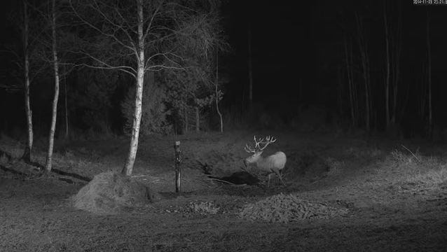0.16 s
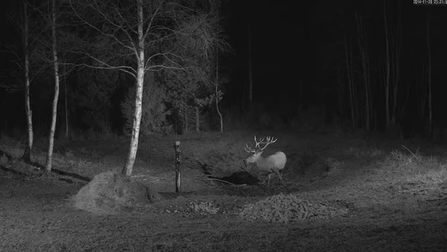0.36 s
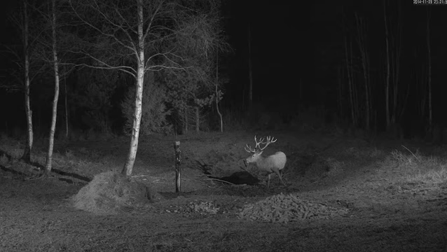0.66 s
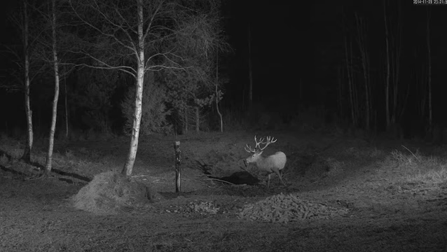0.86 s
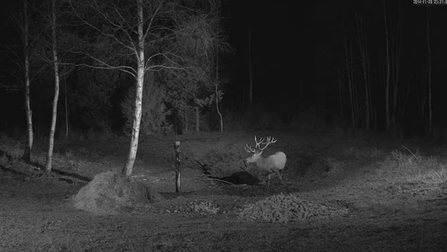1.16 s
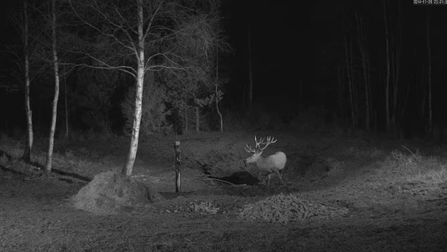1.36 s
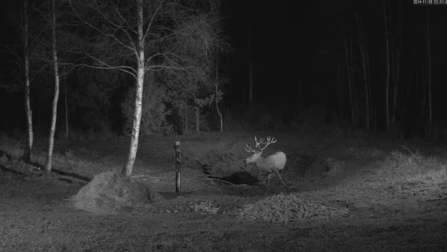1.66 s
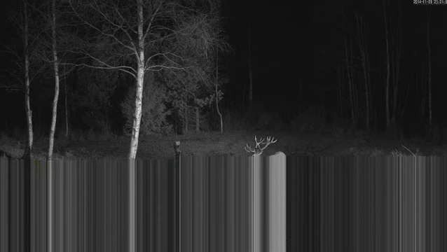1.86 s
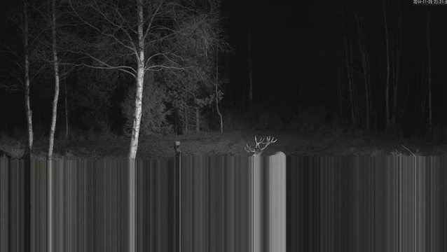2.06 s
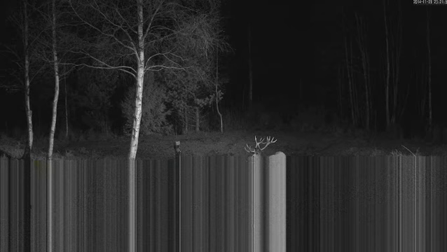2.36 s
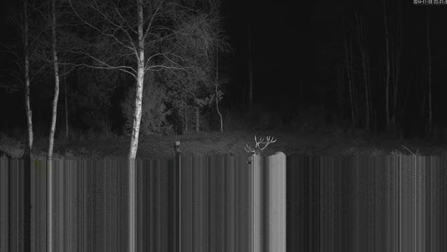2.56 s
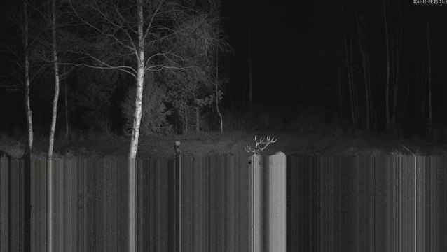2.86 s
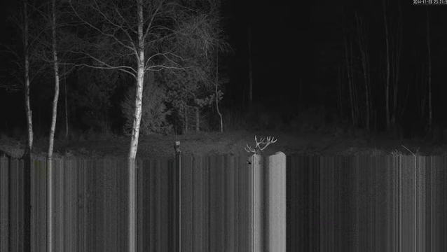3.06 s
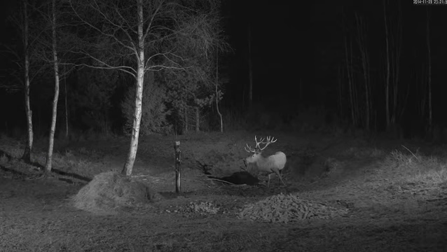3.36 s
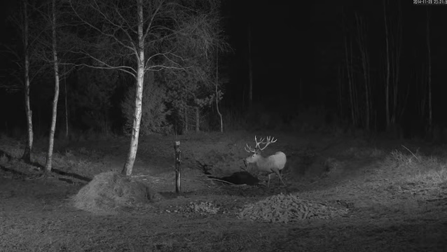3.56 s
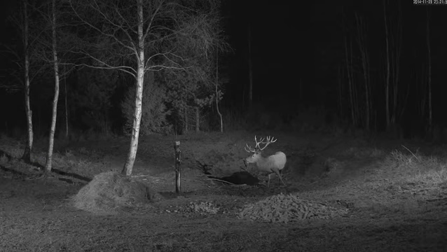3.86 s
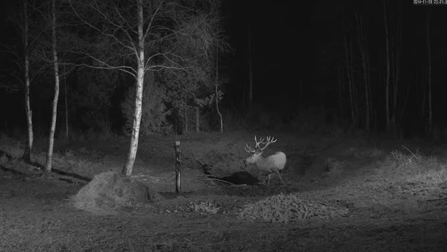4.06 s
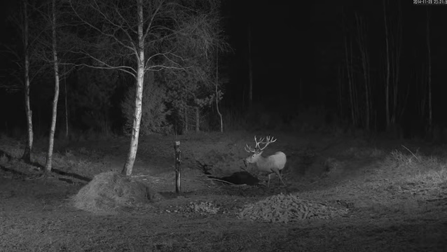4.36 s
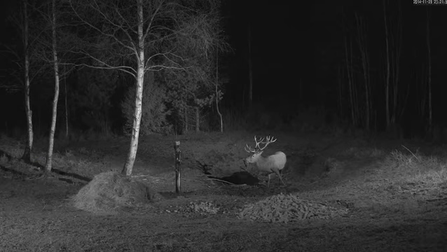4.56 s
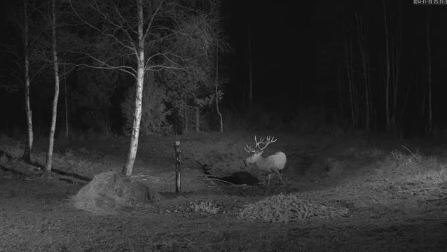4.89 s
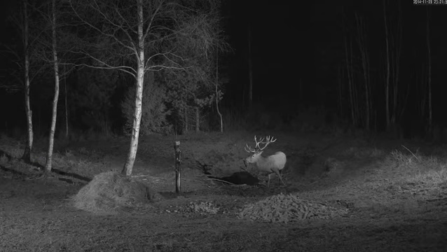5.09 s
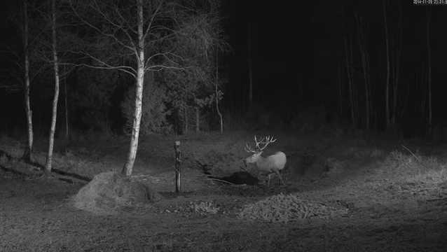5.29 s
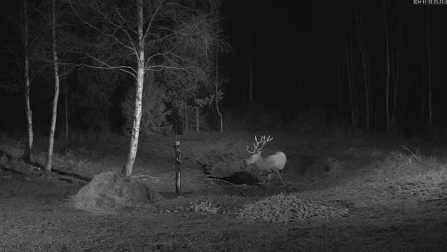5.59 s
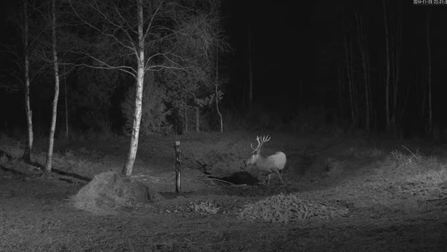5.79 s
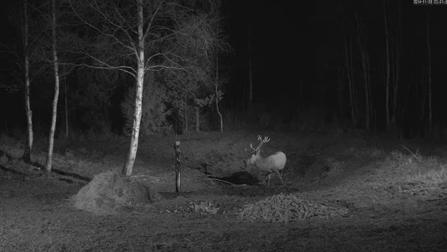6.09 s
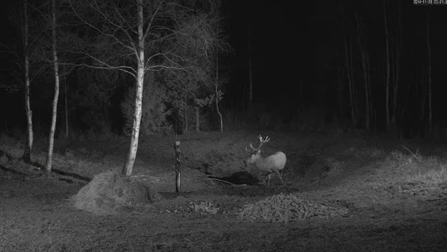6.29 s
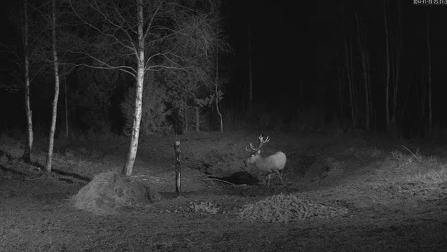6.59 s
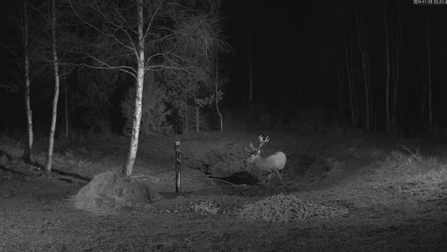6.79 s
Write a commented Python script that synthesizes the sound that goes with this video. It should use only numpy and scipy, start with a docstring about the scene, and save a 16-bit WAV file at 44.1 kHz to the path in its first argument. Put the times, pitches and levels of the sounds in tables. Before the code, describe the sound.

Irregular brittle crunches and clicks of a deer chewing hard feed in quiet woods, with dry rustles, soft hoof thuds and low wind rumble.

```python
"""A forest feeding spot at night: a stag, some way from the microphone, cracks and grinds hard feed.
Each crack is a short noisy break ringing two main resonances; it echoes off nearby trunks and lingers in the wood.
Filtered grains make the grinding and the stirring of dry litter, damped low resonances the hoof thuds.
Low filtered noise buffets the microphone as wind, over the faint banded hush of the wood."""
import sys
import numpy as np
from scipy import signal
from scipy.io import wavfile
from scipy.ndimage import uniform_filter1d

SR = 44100
rng = np.random.default_rng(int(sys.argv[2]) if len(sys.argv) > 2 else 0)


def store_pcm(level_fs):
    """Save levels as 16-bit WAV."""
    pcm = np.round(np.clip(level_fs, -1, 1) * 32767).astype(np.int16)
    wavfile.write(sys.argv[1], SR, np.atleast_2d(pcm).T)


N = 305789


def undb(db):
    """Amplitude factor of a level in dB."""
    return 10 ** (np.asarray(db) / 20)


def level(x, db):
    """Sound brought to an rms level in dB."""
    return x * undb(db) / np.sqrt(np.mean(x ** 2))


def peak(x, db):
    """Sound brought to a peak level in dB."""
    return x * undb(db) / np.max(np.abs(x))


def add(out, start_s, sound):
    """Mix a sound in at its start, cut at the end of the scene."""
    i = int(start_s * SR)
    out[i:i + len(sound)] += sound[:N - i]


def curves(table):
    """Columns of a table as one value per sample, in straight lines between the times of its first column."""
    time_s, *columns = np.transpose(table)
    return [np.interp(np.arange(N) / SR, time_s, column) for column in columns]


def resonate(x, hz, width_hz):
    """Two-pole resonance, gain 1 at the centre."""
    return signal.lfilter(*signal.iirpeak(hz, hz / width_hz, fs=SR), x)


def colour(x, modes):
    """Sum of resonances, each passed twice to steepen it, neighbours in opposite sign."""
    out = 0
    for k, (hz, width_hz, db) in enumerate(modes):
        steep = resonate(resonate(x, hz, width_hz), hz, width_hz)
        out = out + (-1) ** k * undb(db) * steep
    return out


def walk(rate):
    """Random levels held 1 / rate s and smoothed twice; spread near 1."""
    k = int(SR / rate)
    held = np.repeat(rng.standard_normal(N // k + 1), k)
    return 2.16 * uniform_filter1d(uniform_filter1d(held, k), k)[:N]


def grains(per_s, spread_db):
    """Tiny clicks at random moments, a few larger than the rest."""
    hit = rng.random(N) < per_s / SR
    size_db = spread_db * np.minimum(rng.exponential(size=N), 4)
    return hit * rng.standard_normal(N) * undb(size_db)


def hush():
    """Noise in bands a third of an octave apart that swell together and flicker alone."""
    # spectrum of the wood's hush: pitch_hz, relative density_db [dB per Hz]
    spectrum = [(53, -30), (90, 11), (151, -10), (249, 0.5), (352, -4), (652, -1), (976, -10),
                (1430, -19.5), (2980, -19), (4460, -14), (6000, -17.5), (7490, -19.5), (8910, -75),
                (11600, -74), (19600, -120)]
    hz_at, db_at = np.transpose(spectrum)
    out, swell = 0, walk(1.594)
    for hz in 100 * 2 ** np.arange(0, 6.6, 1 / 3):
        db = np.interp(np.log(hz), np.log(hz_at), db_at) + 0.79 * swell + 1.2 * walk(9)
        out = out + undb(db) * colour(rng.standard_normal(N), [(hz, hz / 3, 0)])
    return level(out, -57.5)


def wind():
    """Slow pressure swings on the membrane and a quicker, gusty flutter riding on them."""
    # wind on the microphone before the random gusts: time_s, buffet_db, flutter_db [rms]
    gust_levels = [(0.0, -36.5, -36), (0.35, -25, -60.5), (0.55, -43.5, -51.5), (0.91, -30, -67),
                   (1.15, -38, -52.5), (1.75, -39, -53), (1.95, -34, -68), (2.33, -34, -51.5),
                   (2.87, -32.5, -47), (3.05, -22.5, -55), (3.22, -25, -33), (3.43, -24, -40.5),
                   (3.67, -24.5, -33.5), (3.99, -30.5, -56), (4.1, -23.5, -48), (4.3, -31, -56),
                   (4.46, -19.5, -47), (4.58, -26.5, -51), (4.8, -21, -42), (5.15, -22.5, -49.5),
                   (5.36, -20, -30.5), (5.46, -14, -46), (5.8, -32, -47), (5.9, -30.5, -34),
                   (6.06, -21.5, -49), (6.18, -22, -31), (6.37, -27.5, -52.5), (6.56, -23.5, -35.5),
                   (6.66, -20, -62.5), (6.8, -17, -28.5), (6.93, -24.5, -39)]
    buffet_db, flutter_db = curves(gust_levels)
    # modes: centre Hz, width Hz of each pass, dB
    buffet = colour(rng.standard_normal(N), [(8.24, 9.83, 6.0), (18.7, 17.95, -2.0), (29.85, 11.5, -8.5)])
    flutter = colour(rng.standard_normal(N), [(42.0, 20.8, 9.0), (71.0, 36, -12.5)])
    gust = walk(7.7)
    buffet = np.tanh(0.6 * level(buffet, 0))  # the widest swings are rounded off
    buffet = level(buffet, 0) * undb(buffet_db + 1.0 * gust)
    flutter = level(flutter, 0) * undb(flutter_db + 0.44 * gust + 1.3 * walk(16))
    return buffet + flutter


def wood(x):
    """Smeared echoes off the nearest trunks, then a lumpy tail that builds up and dies band by band."""
    # echoes off single trunks: delay_s, level_db [total energy]
    trunk_echoes = [(.013, -17.5), (0.021, -20), (0.027, -12.5), (.036, -20.5), (0.057, -26.5),
                    (0.086, -25)]
    # lingering tail: centre_hz, t60_s [time to fall 60 dB], level_db [rms before build-up and decay]
    tail_bands = [(600, 0.18, -57), (1040, 0.68, -52), (1810, 1, -54), (2800, 0.66, -50), (4500, 0.64, -46),
                  (6500, 0.95, -60)]
    t = np.arange(SR) / SR
    echo = np.zeros(SR)
    for delay_s, db in trunk_echoes:
        smear = grains(6000, spread_db=1.2)[:SR] * np.exp(-.5 * ((t - delay_s) / 0.0041) ** 2)
        echo += smear * undb(db) / np.sqrt(np.sum(smear ** 2))
    lumps_db = 0.94 * walk(150)[:SR]  # farther trunks stand unevenly
    build_up = 1 - np.exp(-t / 0.067)
    for hz, t60_s, db in tail_bands:
        band = level(colour(rng.standard_normal(SR), [(hz, 0.75 * hz, 0)]), db)
        echo += band * build_up * undb(lumps_db - 60 * t / t60_s)
    return signal.fftconvolve(x, echo)[:N]


def stirs():
    """Level of each litter layer in dB: every stir swells, holds and fades, their powers add."""
    # stirs of the litter: height_s, length_s, crisp rustle_db, dull scrape_db, low shuffle_db [at the height]
    stir_list = [(0.0, 0.052, -54.5, -56.5, -49.5), (0.271, 0.32, -47, -62, -55.5),
                 (0.402, 0.1, -56, -55.5, -57.5), (0.636, 0.12, -52.5, -73, -70),
                 (0.808, 0.2, -46, -58.5, -59), (1.111, 0.12, -53, -70, -62),
                 (1.337, 0.21, -46, -58.5, -59.5), (1.697, 0.24, -51, -58.5, -58.5),
                 (2.078, 0.24, -63, -67.5, -66.5), (2.257, 0.15, -61, -57.5, -58.5),
                 (2.606, 0.23, -54.5, -72.5, -66), (2.774, 0.091, -58.5, -50, -56),
                 (3.014, 0.16, -49, -52, -60), (3.225, 0.14, -53, -54, -49.5),
                 (3.385, 0.45, -57, -60, -54.5), (4.054, 0.13, -58, -61.5, -53.5),
                 (4.3, 0.24, -61, -59, -60), (4.711, 0.16, -64, -51.5, -51),
                 (5.046, 0.061, -61.5, -63.5, -55), (5.32, 0.24, -64, -63, -54.5),
                 (5.932, 0.22, -68.5, -63, -55.5), (6.249, 0.054, -61.5, -62, -59),
                 (6.515, 0.11, -65, -60, -54.5), (6.859, .2, -58.5, -61, -62)]
    swell_db, fade_db = 10, 14  # dB gained per length before the height, lost per length after it
    hold = 0.12  # lengths on either side of the height at full level
    height_s, length_s, *layers_db = np.transpose(stir_list)[:, :, None]
    t = np.arange(0, N, 64) / SR
    away = (t - height_s) / length_s
    slope_db = np.where(away < 0, swell_db, fade_db)
    shape_db = -slope_db * np.maximum(np.abs(away) - hold, 0)
    out = []
    for db in layers_db:
        power = np.sum(undb(db + shape_db) ** 2, axis=0)
        out.append(np.interp(np.arange(N) / SR, t, 10 * np.log10(power)))
    return out


def litter():
    """Dry stalks rustle in the treble, coarser bits scrape lower, weight shuffles below, single bits pop."""
    # colours of the four layers: centre_hz, width_hz [of each pass], relative gain_db
    rustle_modes, scrape_modes = [(3030, 1700, -7), (4280, 1460, 3), (5200, 1100, -2.5), (6260, 1100, -6.5),
                                  (7460, 720, -6.5), (8130, 440, -12.5)], [(1360, 2870, -2), (2250, 2700, 0.5)]
    shuffle_modes, pop_modes = [(146, 122, 4), (321, 386, 2)], [(1300, 1400, -13), (2490, 490, -3), (3530, 460, 12.5),
                                                 (4730, 790, 4.5)]
    brighten = 0.084  # dB that each higher rustle band gains per dB of rustle
    crisp_db, dull_db, low_db = stirs()
    pop_db = -67 + 0.49 * (dull_db + 60.0)  # the harder the scraping, the louder the pops

    crisp = 0
    for k, mode in enumerate(rustle_modes):
        flicker_db = 0.79 * walk(24.65) + brighten * k * (crisp_db + 49.0)
        crisp = crisp + colour(grains(5000, spread_db=0.1), [mode]) * undb(flicker_db)
    crisp = level(crisp, 0) * undb(crisp_db)
    dull = level(colour(grains(4000, spread_db=2.5), scrape_modes), 0) * undb(dull_db + 1.4 * walk(22.01))
    low = level(colour(grains(900, spread_db=1.5), shuffle_modes), 0) * undb(low_db + 1.2 * walk(20))

    # shared and own clicks in each band give the pops differing colours
    shared = grains(77, spread_db=2.0)
    pops = sum(colour(shared + grains(110, spread_db=3.5), [mode]) for mode in pop_modes)
    return crisp + dull + low + level(pops, 0) * undb(pop_db)


def thuds():
    """Hooves push softly on damp ground, which rings for a few cycles."""
    # hoof thuds: start_s, level_db [peak before the final filters], pitch_hz
    hoof_falls = [(0.397, -40.5, 214), (0.877, -38, 265), (1.574, -34.5, 216), (1.582, -38, 405),
                  (1.683, -45, 305), (2.249, -38.5, 220), (2.958, -30, 175), (3.075, -47, 286),
                  (3.183, -39.5, 242), (3.224, -41.5, 250), (3.284, -45, 298), (3.396, -48, 300),
                  (3.452, -41, 280), (5.967, -43, 210), (6.328, -40, 306), (6.425, -34.5, 282),
                  (6.516, -30, 350), (6.33, -50, 160), (6.82, -43, 300), (5.359, -41, 180)]
    out, t = np.zeros(N), np.arange(4096) / SR
    chance = rng.standard_normal((len(hoof_falls), len(t)))
    for (start_s, db, hz), noise in zip(hoof_falls, chance):
        push = (1 + 0.76 * noise) * t * np.exp(-t / 0.0022)
        add(out, start_s, peak(resonate(resonate(push, hz, 68), hz, 200), db))
    return out


def grinds():
    """Teeth crush the feed: a short run of uneven grains in two bands."""
    # grinding bouts: start_s, length_s, lower band_hz, upper band_hz, lower level_db, upper level_db
    # [rms of each band before its fade in and out]
    bouts = [(2.948, 0.01, 1060, 3400, -38.5, -34), (2.954, 0.014, 1500, 3600, -44.5, -42),
             (3.168, 0.021, 1010, 4300, -47, -51), (3.366, 0.021, 980, 2000, -55, -59),
             (3.996, .014, 1200, 5200, -53.5, -54.5), (4.008, 0.016, 2070, 6440, -49, -56),
             (4.022, 0.0086, 2170, 6500, -40, -51), (4.134, 0.0085, 1290, 3500, -49, -50.5),
             (4.252, 0.032, 1490, 3500, -55, -59), (4.225, 0.018, 1700, 5000, -43, -58),
             (4.567, 0.013, 1280, 2600, -45.5, -43.5), (4.599, 0.029, 1500, 2700, -55.5, -57.5),
             (4.699, 0.05, 2320, 4000, -54, -61), (5.181, 0.016, 1210, 2500, -59, -60),
             (5.261, .03, 1800, 3400, -60, -64), (5.312, 0.033, 1480, 2900, -63.5, -67),
             (5.343, 0.033, 1470, 3900, -59.5, -57), (5.84, 0.037, 1050, 3600, -60.5, -66),
             (5.886, 0.036, 1800, 3600, -62.5, -64), (1.704, 0.019, 1320, 2590, -56, -49),
             (1.753, 0.027, 2420, 4500, -52.5, -56), (1.781, 0.025, 2400, 4300, -58, -65),
             (6.552, 0.018, 1800, 4500, -56, -63.5), (6.421, 0.021, 1290, 2800, -54.5, -53),
             (6.504, 0.038, 1650, 4200, -53.5, -66)]
    grit_per_s, grit_width = 1500, 0.48  # grains giving way; band width as a share of its centre
    out, t = np.zeros(N), np.arange(4096) / SR
    chance = rng.random((len(bouts), 2, len(t)))
    for (start_s, length_s, low_hz, high_hz, low_db, high_db), (when, size) in zip(bouts, chance):
        grit = (0.057 + (when < grit_per_s / SR)) * (2 * size - 1)
        shape = np.clip(np.minimum(t, length_s - t) / 0.006, 0, 1)
        for hz, db in [(low_hz, low_db), (high_hz, high_db)]:
            width_hz = grit_width * hz
            band = colour(shape * level(grit, db), [(hz, width_hz, 0)])
            add(out, start_s, band * np.sqrt(SR / width_hz))  # makes up for what the band leaves out
    return out


def cracks():
    """A break of about a millisecond rings short resonances, with a treble tick and a dull knock.
    Returns the direct sound and the broader sound that leaves towards the trees."""
    # cracks: start_s, lower ring_hz, upper ring_hz, lower ring_db, upper ring_db, treble tick_db,
    # body knock_db [peak of each part before the final filters]
    crack_list = [(0.0596, 2790, 3960, -47, -19, -19, -48.5), (1.1248, 1300, 4050, -56, -27, -58, -68),
                  (1.2368, 2590, 4580, -43, -13, -13.5, -48.5), (1.2903, 2550, 4640, -36, -20, -27.5, -48),
                  (1.5725, 1760, 3600, -29, -25.5, -60, -34.5), (1.596, 1490, 4700, -49, -42, -58, -48),
                  (1.6846, 1970, 4100, -27, -22, -51, -51), (1.6891, 2570, 4100, -28.5, -42, -51, -38),
                  (2.026, 1120, 4470, -61, -42, -47, -50), (2.318, 1160, 4050, -39.5, -41, -56, -44),
                  (2.2726, 1290, 4700, -50, -49, -57, -46), (2.346, 1740, 3540, -43, -44.5, -57, -48.5),
                  (2.6587, 2780, 2850, -36.5, -50, -73, -67), (2.7164, 2020, 4150, -30, -16.5, -47, -36.5),
                  (2.721, 1780, 3900, -27.5, -13.5, -53, -38), (2.7244, 1740, 4500, -31, -31, -60, -45.5),
                  (2.7436, 2200, 3900, -37, -28.5, -51, -50), (2.9492, 2950, 3700, -18, -25, -55, -37),
                  (2.9753, 1500, 3800, -51, -35, -47.5, -54), (2.995, 2600, 3900, -35, -41, -53.5, -57.5),
                  (3.08, 900, 2980, -42, -49, -61, -48), (2.9655, 2170, 3400, -46, -28, -44, -38),
                  (2.9529, 1530, 3700, -26, -25.5, -49.5, -41), (2.9552, 1000, 2490, -29, -29, -51, -40),
                  (2.9578, 990, 3600, -30, -30, -59, -36.5), (3.1821, 2480, 4430, -30, -35.5, -50, -43),
                  (3.2248, 1230, 4370, -48, -38.5, -69, -43.5), (3.266, 1520, 4100, -35.5, -41, -46, -43),
                  (3.456, 1530, 2680, -39, -38.5, -67, -45), (3.526, 1100, 3450, -40, -47, -66, -61),
                  (3.638, 990, 4220, -52, -43, -54, -47), (4.0085, 1900, 3020, -32, -37, -34.5, -47),
                  (4.0182, 2020, 3110, -36, -44, -43, -48), (4.0155, 2180, 5200, -38.5, -43, -37, -55),
                  (4.0273, 2230, 3100, -39, -40.5, -40, -42), (4.0326, 1900, 3500, -31, -53, -39, -48),
                  (4.0645, 1200, 3300, -44, -48, -53.5, -50), (4.083, 2200, 4170, -44.5, -47, -58, -54.5),
                  (4.1055, 2280, 3300, -49, -46, -61, -54), (4.133, 1420, 3050, -41.5, -47, -49, -57),
                  (4.2046, 1620, 3740, -25, -20, -31.5, -52), (4.2106, 1500, 3580, -34, -48, -57, -56),
                  (4.218, 2600, 5200, -51, -41, -48, -61), (4.116, 2530, 5400, -55, -46, -53, -59),
                  (4.374, 1320, 4640, -44.5, -36, -56, -56), (4.45, 1160, 3700, -52, -30.5, -60, -57),
                  (4.471, 1160, 3400, -43.5, -35.5, -76, -63), (4.5462, 1660, 3740, -25, -24, -60, -35.5),
                  (4.5506, 1900, 4300, -29, -37.5, -59, -41.5), (4.5615, 2000, 4200, -48.5, -44, -56, -47),
                  (4.589, 1380, 4080, -37, -45, -64, -51), (4.6797, 1900, 3840, -35, -21.5, -35, -47.5),
                  (4.714, 1700, 4300, -31.5, -31.5, -52, -43), (4.7184, 1800, 2980, -36.5, -48, -55, -49),
                  (4.732, 1500, 3480, -46, -44, -50, -53), (4.745, 2500, 4300, -43, -44, -56, -52),
                  (5.013, 1140, 4270, -53, -37.5, -57, -44), (5.113, 1500, 3280, -42.5, -51, -60.5, -50),
                  (5.1513, 2580, 4130, -44, -40.5, -61, -57), (5.1638, 1250, 3980, -39.5, -41, -58, -55),
                  (5.213, 1100, 3400, -52, -47, -64, -55), (5.244, 1380, 3610, -43, -47, -56, -48),
                  (5.275, 1830, 3490, -53, -54, -43.5, -46), (5.357, 1110, 3800, -42.5, -49, -50, -45),
                  (5.592, 2100, 3000, -51, -59, -65, -57), (5.6652, 1330, 3290, -59, -44, -52, -63),
                  (5.74, 2000, 2840, -56.5, -48.5, -71, -57), (5.7676, 1220, 3040, -61, -47, -61, -59),
                  (5.9, 1340, 3700, -55, -40, -49, -49), (5.9299, 1900, 3580, -45.5, -40.5, -50, -45),
                  (5.9336, 1700, 3500, -44, -38.5, -52, -49), (5.913, 2000, 3400, -51, -47.5, -57, -49),
                  (5.9486, 1330, 3070, -56, -49, -52.5, -51), (5.9721, 2400, 3580, -38, -30.5, -53, -43.5),
                  (6.002, 1380, 3890, -46, -31, -53, -54), (6.161, 1490, 3060, -43.5, -48, -63, -55),
                  (6.1777, 1470, 4370, -47, -47, -60, -61), (6.4318, 1300, 2630, -39.5, -34, -68, -45),
                  (6.4913, 1670, 3900, -27, -24.5, -54, -48), (6.507, 1890, 3600, -42, -43, -54, -55),
                  (6.5133, 2120, 3880, -37, -48, -56, -51), (6.519, 1640, 4420, -29.5, -35.5, -56, -34.5),
                  (6.818, 1290, 3940, -39, -38, -64, -62), (6.8402, 1700, 4520, -39, -44, -60, -53),
                  (6.9243, 1900, 4250, -33, -39, -48, -55)]
    # per part (lower ring, upper ring, tick, knock, middle ring): gain_db towards the trees
    thrown_db = [2, 2, 0.5, 2.2, 0.5]
    # same five parts: splinter_db [relative to the break]
    splinter_db = [-3, -7, -16.5, -8, -5]
    snap_at, snap_db = 26, 19  # samples of strain before the snap; dB over the noise's full scale
    chip_spread_db = 4.5  # unevenness of the splinters
    snap_signs = np.array([1, -1, 1, 1, -1])  # neighbouring rings in opposite sign

    direct, thrown, t = np.zeros(N), np.zeros(N), np.arange(2048) / SR
    edge = np.exp(-t / .00003)  # the bare break
    onset, strain = 1 - np.exp(-t / 0.00046), np.exp(-t / 0.0012)
    chance = rng.standard_normal((len(crack_list), 5, len(t)))
    for (start_s, low_hz, high_hz, low_db, high_db, tick_db, knock_db), noise in zip(crack_list, chance):
        # the feed strains, snaps, then splinters give way one after another
        chips = undb(chip_spread_db * np.repeat(noise[0, ::32], 32))
        splinters = undb(splinter_db)[:, None] * chips * np.exp(-t / 0.0044)
        split = noise * onset * (strain + splinters)
        split[:, snap_at] += undb(snap_db) * np.sign(noise[0, 0]) * snap_signs
        # centre Hz, width Hz, peak dB
        parts = [(low_hz, 900, low_db), (high_hz, 1700, high_db), (6600, 1800, tick_db), (550, 400, knock_db),
                 (1250, 700, (low_db + knock_db) / 2 - 4.0)]  # a middle ring, between knock and rings
        for x, (hz, width_hz, part_db), away_db in zip(split, parts, thrown_db):
            ring = resonate(colour(x, [(hz, width_hz, 0)]), hz, 2.66 * width_hz)
            add(direct, start_s, peak(ring, part_db))
            # seen from all sides at once the rings blur into wider bands
            blur = colour(edge, [(hz, 1.5 * width_hz, 0)])
            add(thrown, start_s, peak(blur, part_db + away_db))
    return direct, thrown


def scene():
    """The stag's cracks, thuds and grinding with their echoes, over litter, wind and hush."""
    direct, thrown = cracks()
    dull = thuds() + grinds()
    far = direct + dull + wood(thrown + dull)
    # air and the animal's own bulk dull the top of these sounds
    far = signal.sosfilt(signal.butter(2, 7800, fs=SR, output="sos"), far)
    return (far + litter() + wind() + hush())[None]


def record(dry):
    """The treble rolls off from 8 kHz, then a steep cut at 8.8 kHz."""
    soft = signal.sosfilt(signal.butter(2, 8000, fs=SR, output="sos"), dry)
    return signal.sosfilt(signal.ellip(8, .2, 70, 8800, fs=SR, output="sos"), soft)


dry = scene()
out = record(dry)
store_pcm(out)
```